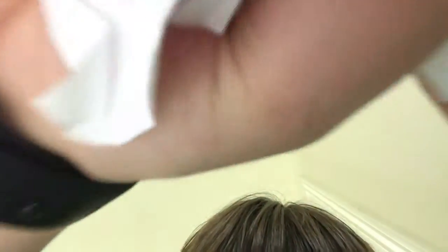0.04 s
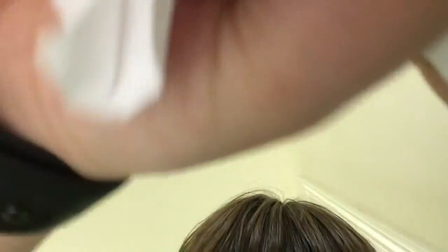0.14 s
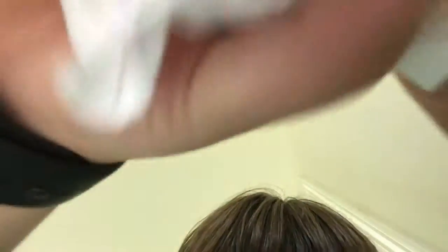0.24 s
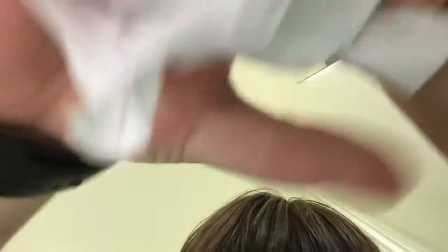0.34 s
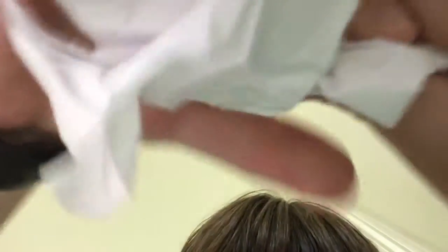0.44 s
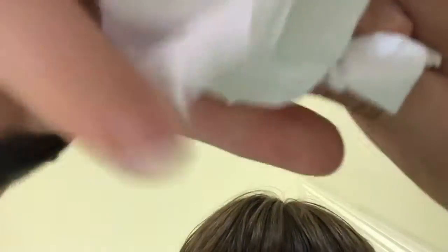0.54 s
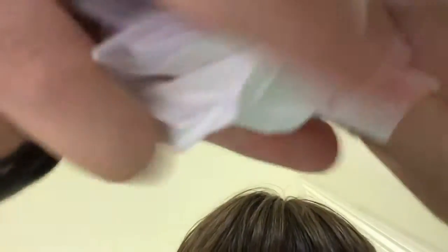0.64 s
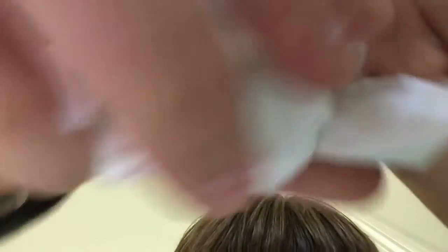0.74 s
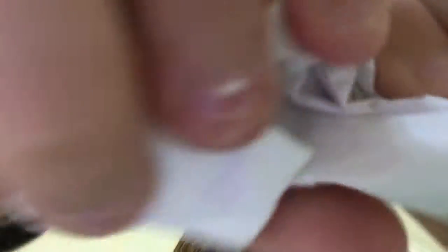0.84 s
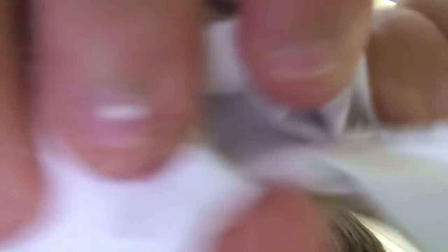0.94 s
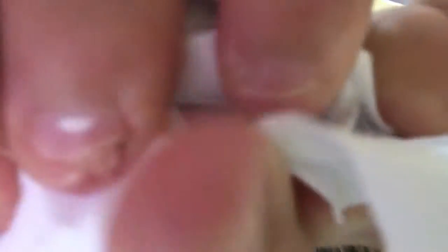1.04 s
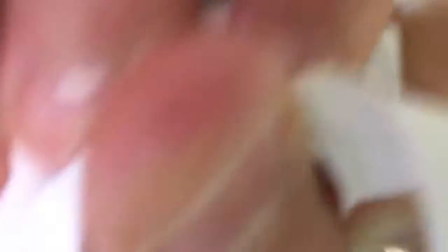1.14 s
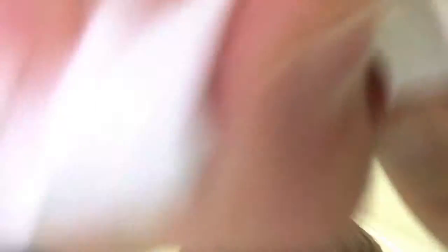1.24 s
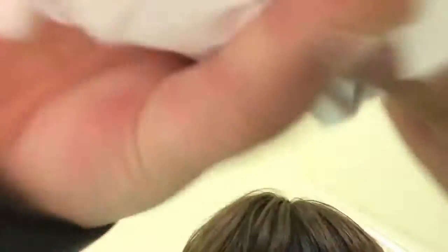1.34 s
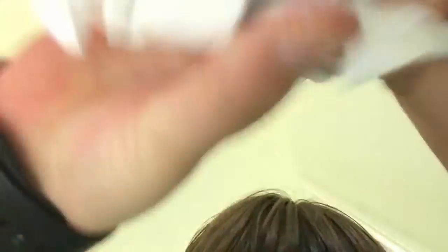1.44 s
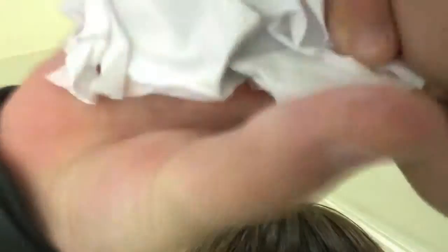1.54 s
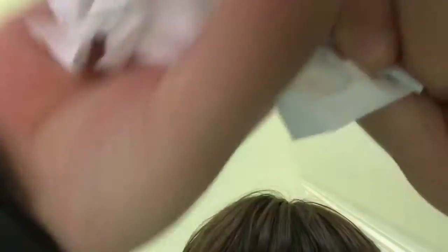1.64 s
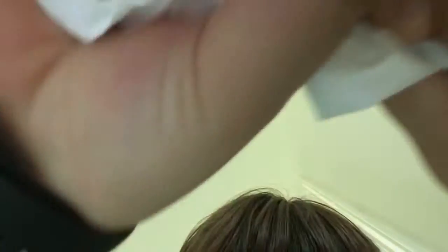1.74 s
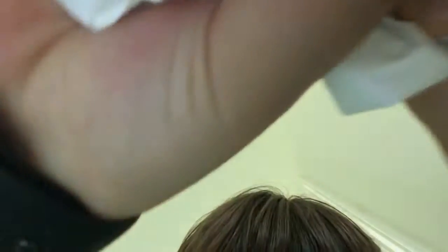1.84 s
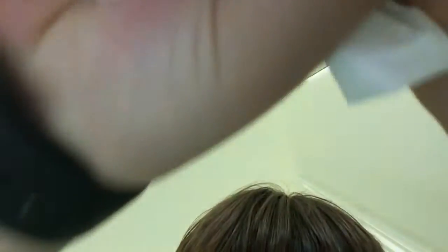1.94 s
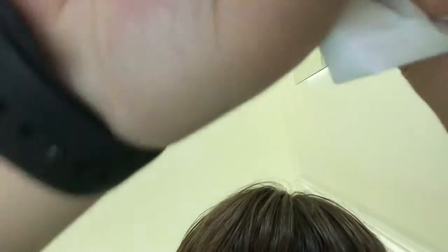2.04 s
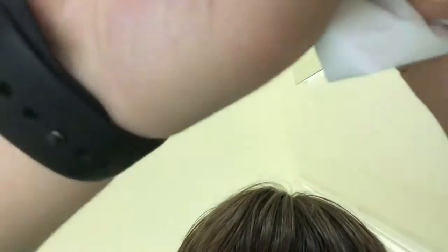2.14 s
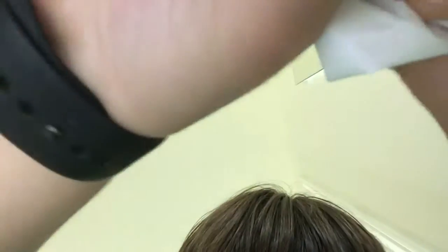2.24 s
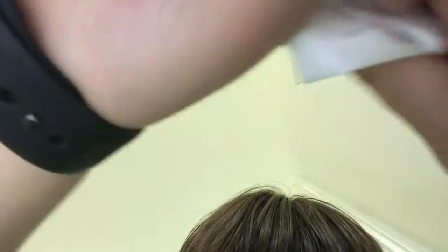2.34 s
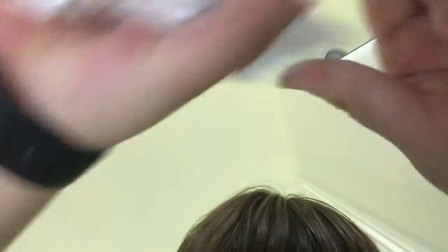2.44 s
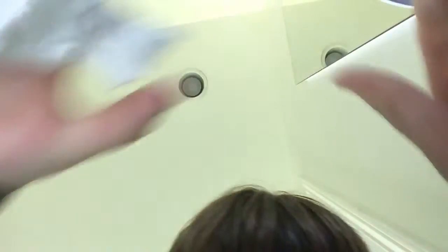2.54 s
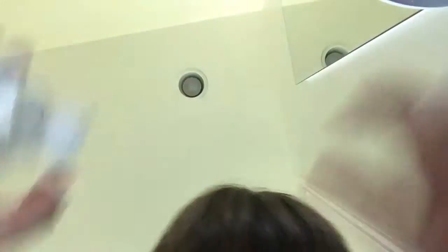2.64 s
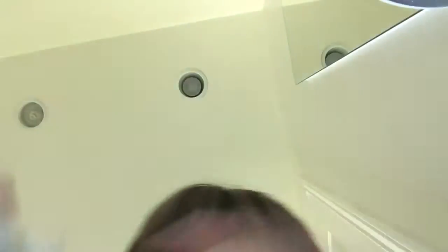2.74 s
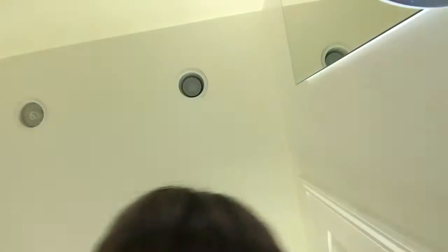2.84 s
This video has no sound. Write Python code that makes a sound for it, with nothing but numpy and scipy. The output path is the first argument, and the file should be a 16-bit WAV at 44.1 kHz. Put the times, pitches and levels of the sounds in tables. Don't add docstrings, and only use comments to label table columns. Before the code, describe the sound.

Paper crumpling in both hands, close to a phone microphone. Faint rustle at first, then a dense crackling burst at 0.2-0.5 s and lighter snaps at 0.8-0.9. The loudest, sharp snap comes at 1.1 s, a thick cluster at 1.4-1.55, another snap at 1.8. After near quiet, softer crackles at 2.4-2.65 thin to ticks. Small dull air thumps, faint room reverberation and low hum.

```python
import sys
import numpy as np
from scipy import signal
from scipy.fft import rfft, irfft
from scipy.io import wavfile

SR = 44100
rng = np.random.default_rng(int(sys.argv[2]) if len(sys.argv) > 2 else 0)


def boost(x):
    u = np.asarray(x, float) / 20
    return 10 ** u


def materialize(psi):
    bounded = np.clip(np.atleast_2d(psi).T, -1, 1)
    quanta = np.round(bounded * 32767).astype(np.int16)
    wavfile.write(sys.argv[1], SR, quanta)


N = 127890

# start_s, level_db (peak), pitch_hz (panel), edge_db
CREASE_SNAPS = [(0.058, -36, 4850, -15), (0.198, -37, 5350, -6), (0.2297, -17.5, 5110, -9.5),
                (0.2562, -22.5, 4900, 4), (0.2722, -25.5, 6070, 4), (0.301, -26, 2250, -18),
                (0.307, -9.5, 3940, -28), (0.3223, -15, 1790, -3.5), (0.3461, -14.5, 3230, 11),
                (0.3612, -19, 2620, 6), (0.3769, -16, 2900, -16), (0.4487, -31.5, 2300, -1),
                (0.4698, -11, 2410, 25), (0.4837, -13, 2410, 19), (0.5769, -31.5, 2230, 7),
                (0.7227, -29.5, 4000, 2.5), (0.7854, -20, 4460, 7.5), (0.8, -23.5, 6300, -9.5),
                (0.81, -23.5, 5650, -20.5), (0.8622, -22.5, 4940, 2.5), (0.8903, -15, 1840, 1.5),
                (0.9125, -30.5, 3080, 11),
                (1.0585, -37, 7000, -13), (1.0874, -3.5, 1830, -11.5), (1.129, -14.5, 2200, -7),
                (1.2735, -46, 7440, 6), (1.2907, -37, 2430, 19), (1.3246, -35, 2300, -7),
                (1.361, -29, 2170, 8.5), (1.4041, -16, 2280, -8), (1.4209, -15.5, 2690, 4),
                (1.4275, -15, 4700, -13.5), (1.443, -12.5, 1950, 6), (1.4568, -14.5, 2240, 8),
                (1.4758, -40, 2470, -7), (1.485, -9, 2110, 6.5), (1.5116, -15.5, 3230, 13),
                (1.5314, -23.5, 4850, 10), (1.5346, -18.5, 2250, 28), (1.635, -26.5, 2470, -6.5),
                (1.6807, -34, 2680, 7), (1.8097, -11.5, 2000, -8), (1.8137, -24, 4300, -0.5),
                (1.8319, -13.5, 2070, -11.5), (1.9215, -25.5, 5500, 1),
                (2.0144, -49, 4490, -17), (2.032, -34, 3620, -9), (2.0445, -37, 4430, -11),
              (2.0954, -21.5, 5260, 2), (2.113, -35, 6370, -3), (2.214, -52.5, 3010, -12),
              (2.328, -49, 6600, 1.5), (2.3404, -46, 3730, -3), (2.355, -42.5, 2960, 7.5),
              (2.381, -42, 6000, -4), (2.3854, -23, 3920, -13), (2.4073, -26, 6150, -12),
              (2.418, -24.5, 3000, -2), (2.44, -24, 2940, -12), (2.4453, -18, 2900, 10),
              (2.4524, -18.5, 3600, -25), (2.4777, -22, 2780, 4), (2.487, -28, 2590, 6),
              (2.504, -19.5, 3040, -5), (2.5428, -22.5, 2950, -23), (2.5489, -20, 2750, -11),
              (2.602, -20, 2720, 15), (2.6128, -23.5, 4970, 1), (2.6184, -32, 2600, -15),
              (2.6476, -24, 4450, 9), (2.6565, -29, 2600, 12), (2.7903, -30, 5350, -1),
              (2.815, -37, 2500, 2), (2.849, -24, 1990, -46),
                (0.465, -39, 2400, 9), (0.46, -20, 1500, -5), (0.574, -24.5, 2300, 6),
              (0.57, -20.5, 2100, -7), (0.626, -39, 2100, 2), (0.63, -40, 2200, 13), (0.689, -38, 2700, 6),
              (0.7879, -19.5, 5300, 1), (0.8429, -18, 5600, -3), (0.906, -31, 4900, -3),
              (0.933, -28.5, 4500, 1), (1.0537, -29, 8900, -15), (1.0855, -23, 2820, 7),
              (1.093, -36, 1700, -12), (1.811, -18, 3700, -10), (1.687, -42, 6950, 7),
              (2.122, -50, 7000, 0), (2.173, -48.5, 830, -5.5), (2.381, -42, 7000, -10),
              (2.387, -26, 7800, -21), (2.574, -31, 2700, 0), (2.751, -44, 2400, -5),
              (2.8178, -30, 2230, 0), (1.09, -16, 1086, -20), (1.13, -31.5, 930, -20), (0.25, -29, 4000, 2),
              (0.391, -32.5, 6000, -7), (0.26, -27, 7600, 2), (2.467, -26, 6900, -4), (2.554, -42, 3000, 0),
              (1.475, -18, 2460, -9), (1.832, -20, 5700, -7), (0.32, -23, 4600, 9),
              (1.087, -21.5, 3650, -20), (1.8102, -18, 3560, -22), (1.9, -38, 2800, 0),
              (2.829, -40, 2000, 3), (2.701, -43, 2600, -5)]
# start_s, length_s, level_db, brightness_db
FINGER_STROKES = [(0, 0.089, -44, -0.5), (0.105, 0.076, -61.5, -4), (0.2, 0.064, -49, -3),
                  (0.282, 0.087, -34.5, -2), (0.397, 0.043, -52.5, -1), (0.468, 0.12, -41, -2.5),
                  (0.616, 0.035, -52.5, -4.5), (0.695, 0.028, -41, -3), (0.716, 0.07, -71, 8),
                  (0.771, 0.045, -40, -1.5), (0.828, 0.068, -36, -0.5), (0.899, 0.042, -37, -1.5),
                  (0.962, 0.096, -38.5, 2.5), (1.08, 0.11, -47, -2.5), (1.205, 0.076, -61.5, -6.5),
                  (1.317, 0.059, -43, -2), (1.403, 0.072, -32, -2.5), (1.505, 0.051, -45.5, -1.5),
                  (1.564, 0.018, -47.5, -2.5), (1.617, 0.024, -46, -3.5), (1.698, 0.082, -49.5, -5.5),
                  (1.783, 0.085, -41, -3.5), (1.892, 0.036, -39.5, -0.5), (1.94, 0.067, -40.5, 0),
                  (2.028, 0.096, -54, 0.5), (2.136, 0.079, -67, -1.5), (2.38, 0.045, -53.5, -1.5),
                  (2.442, 0.076, -41.5, 1), (2.536, 0.015, -41.5, 2), (2.567, 0.094, -46.5, -2),
                  (2.683, 0.078, -57, -3), (2.79, .13, -53, -3.5)]
# start_s, level_db (peak), pitch_hz (at the start), fall_s
AIR_PUFFS = [(0.325, -28.5, 740, 0.0042), (.345, -33, 250, 0.0092), (.376, -36, 201, 0.011),
             (.47, -30, 820, 0.0014), (0.4846, -23.5, 920, 0.0069), (0.522, -39, 149.9, 0.016),
             (.913, -27, 1100, 0.0037), (1.088, -30.5, 870, 0.0015), (1.428, -32.5, 605, 0.0033),
             (1.446, -32, 308, 0.0074), (1.459, -28, 300, 0.0085), (1.472, -38, 300, 0.0068),
             (1.4855, -29, 450, 0.023), (1.513, -29.5, 494, 0.0054), (1.543, -31, 198, 0.0058),
             (1.626, -39, 120, 0.0092), (2.449, -42, 300, .006), (2.479, -29.5, 313, 0.0059),
             (2.505, -32, 397, 0.013), (2.546, -41, 247, 0.0089), (2.576, -42.5, 250, 0.0087),
             (2.609, -45.5, 252, 0.014), (2.653, -45, 305, 0.0046), (2.815, -46.5, 460, 0.011),
             (2.851, -44, 463, 0.0037)]
# frequency_hz, density_db (per Hz)
COLOUR_SPECTRUM = [(300, -5.5), (1000, -3), (2200, 3), (3400, 0), (5100, 1), (7800, -9.5), (13000, -24.5),
                   (16300, -12.5)]
# frequency_hz, density_db (per Hz)
ROOM_SPECTRUM = [(30, -1), (65, 4), (124, -11), (240, -3.5), (330, -9.5), (600, -25), (4400, -27.5),
                 (16000, -43.5)]


def rms_one(x):
    return x / np.sqrt(np.mean(x ** 2) + 1e-20)


def coloured(x, spectrum):
    table_hz, table_db = np.array(spectrum).T
    hz = np.maximum(np.fft.rfftfreq(len(x), 1 / SR), 1)
    gain_db = np.interp(np.log(hz), np.log(table_hz), table_db)
    return irfft(rfft(x) * boost(gain_db), len(x))


def drift(rate_hz):
    pole = np.exp(-2 * np.pi * rate_hz / SR)
    noise = rng.standard_normal(N + SR)
    return rms_one(signal.lfilter([1], [1, -2 * pole, pole * pole], noise)[SR:])


def ring(x, hz, cycles):
    radius = boost(-60 * hz / cycles / SR)
    angle = 2 * np.pi * hz / SR
    zeros = [1 - radius * radius, 0, radius * radius - 1]
    poles = [2, -4 * radius * np.cos(angle), 2 * radius * radius]
    return signal.lfilter(zeros, poles, x + 1e-18)


def cut(x, hz, kind):
    return signal.sosfilt(signal.butter(2, hz, kind, fs=SR, output="sos"), x)


def snaps():
    before, after = 400, 1200
    fall_s, cycles = 0.0004, 3.4
    lead_db, lead_s = -11, 0.002
    tail_db, tail_s = -14.5, 0.0061
    t = np.arange(-before, after) / SR
    late = np.maximum(t, 0)
    burst = late ** 2 * np.exp(-late / fall_s)
    burst = burst / burst.max()
    creak = boost(lead_db) * np.exp(t / lead_s) * (t <= 0)
    hiss = boost(tail_db) * np.exp(-late / tail_s) * (t > 0)
    click = boost(10) * (burst == 1)

    out = np.zeros(N + SR)
    for start_s, level_db, pitch_hz, edge_db in CREASE_SNAPS:
        white = rng.standard_normal((2, len(t)))
        slips = white[0] * burst + white[1] * (hiss + creak) + click
        upper_hz = min(1.99 * pitch_hz, 15000)
        panel = rms_one(ring(ring(slips, pitch_hz, cycles), pitch_hz, cycles))
        upper = boost(-10) * rms_one(ring(slips, upper_hz, 2 * cycles))
        edge = boost(edge_db) * rms_one(coloured(slips, COLOUR_SPECTRUM))
        x = panel + upper + edge
        i = int(start_s * SR) - before
        out[i:i + len(t)] += boost(level_db) * x / np.abs(x).max()
    return out[:N]


def hand():
    rise_s, bright_fall_s, dull_fall_s = 0.0086, 0.012, 0.02
    t = np.arange(N) / SR
    low_gain, high_gain = 1e-9, 1e-9
    for start_s, length_s, level_db, brightness_db in FINGER_STROKES:
        rise = np.minimum((t - start_s) / rise_s, 0)
        after = np.minimum(start_s + length_s - t, 0)
        low_gain = low_gain + np.exp(rise + after / dull_fall_s) * boost(level_db - brightness_db)
        high_gain = high_gain + np.exp(rise + after / bright_fall_s) * boost(level_db + brightness_db)
    return low_gain, high_gain


def rustle(low_gain, high_gain):
    grains_per_s, smear_s, cycles = 3300, 0.0019, 8.8
    sizes = boost(0.5 * np.minimum(rng.exponential(1, N), 3))
    chance = rng.random(N)
    clumps = boost(2.5 * drift(90))
    born = chance < grains_per_s * clumps / SR
    pitches_hz = np.geomspace(500, 14000, 24)
    dealt = rng.integers(0, 24, N)
    smear = np.hanning(int(smear_s * SR) + 3)
    white = rng.standard_normal((2, N))

    grains, rub = 0, 0
    for k, hz in enumerate(pitches_hz):
        patch = boost(4.5 * drift(7.1)) / np.sqrt(hz)
        slips = np.convolve(sizes * born * (dealt == k), smear, "same") * white[0]
        grains = grains + patch * ring(slips, hz, cycles)
        rub = rub + patch * ring(np.roll(white[1], 999 * k), hz, cycles)

    rub_gain = boost(-4 + 2.5 * drift(110))
    x = boost(-5) * rms_one(grains) + rub_gain * rms_one(rub)
    x = np.diff(x, prepend=0) + 0.13 * x
    x = rms_one(coloured(x, COLOUR_SPECTRUM))
    low = cut(x, 3200, "low")
    top = cut(cut(x, 8800, "high"), 8800, "high")
    top_gain = np.sqrt(high_gain / low_gain) - 1
    return low * low_gain + (x - low + top * top_gain) * high_gain


def puffs(stir):
    stretch_turns, rise_s = 1.16, 0.0002
    out = np.zeros(N)
    t = np.arange(4000) / SR
    wobble = 0.12 * drift(33)
    for start_s, level_db, pitch_hz, fall_s in AIR_PUFFS:
        i = int(start_s * SR)
        n = min(len(t), N - i)
        turns = stretch_turns * np.log(1 + t[:n] * pitch_hz / stretch_turns)
        uneven = (wobble[i:i + n] - wobble[i]) * np.minimum(turns / 2, 1)
        envelope = np.exp(-t[:n] / fall_s) * (1 - np.exp(-t[:n] / rise_s))
        out[i:i + n] += boost(level_db) * np.sin(2 * np.pi * (turns + uneven)) * envelope

    flutter = cut(cut(rng.standard_normal(N), 200, "low"), 60, "high")
    lumps = flutter * boost(2.5 * drift(33))
    return out + boost(-23) * stir * rms_one(lumps)


def walls(x):
    t60_s, echo_db = 0.42, -24
    t = np.arange(SR // 2) / SR
    noise = cut(rng.standard_normal(len(t)), 3800, "low")
    tail = noise * boost(-60 * t / t60_s) * (t > 0.006)
    return boost(echo_db) * signal.fftconvolve(x, tail / np.sqrt(np.sum(tail ** 2)))[:N]


def room_hum():
    return boost(-65) * rms_one(coloured(rng.standard_normal(N), ROOM_SPECTRUM))


def scene():
    low_gain, high_gain = hand()
    paper = rustle(low_gain, high_gain) + snaps()
    room = room_hum()
    mix = paper + walls(paper) + puffs(low_gain) + room
    return mix[None]


def band_limit(x):
    return signal.sosfilt(signal.butter(12, 16670, fs=SR, output="sos"), x)


def record(dry):
    bass_cut = signal.butter(5, 60, "high", fs=SR, output="sos")
    top_cut = signal.cheby2(12, 70, 16750, fs=SR, output="sos")
    x = signal.sosfilt(bass_cut, dry)
    x = signal.sosfilt(top_cut, x)
    return band_limit(x)


dry = scene()
out = record(dry)
materialize(out)
```